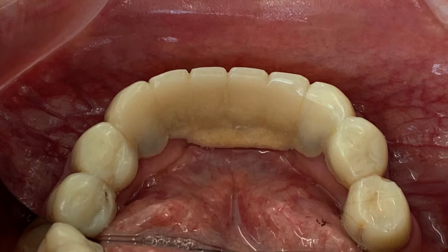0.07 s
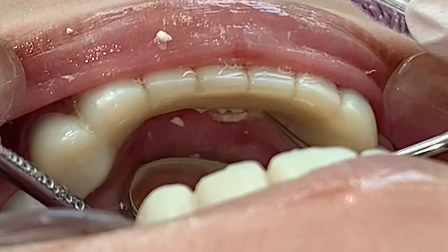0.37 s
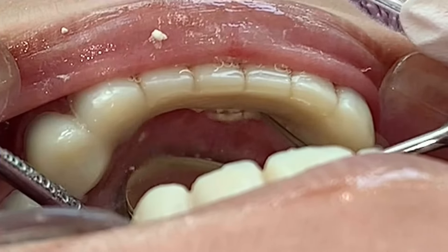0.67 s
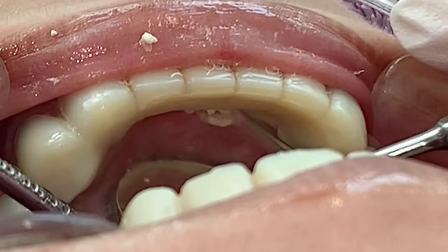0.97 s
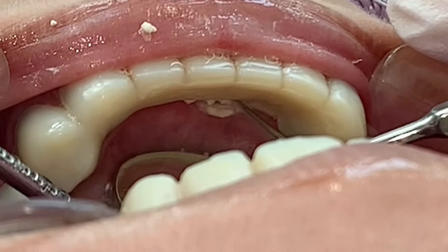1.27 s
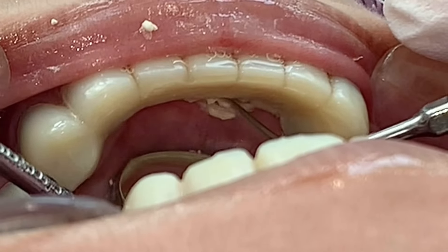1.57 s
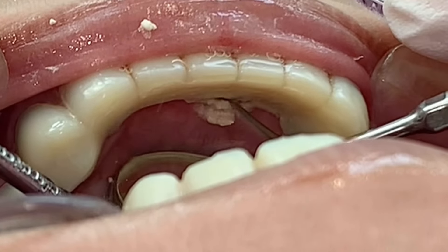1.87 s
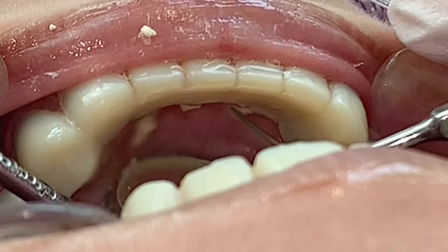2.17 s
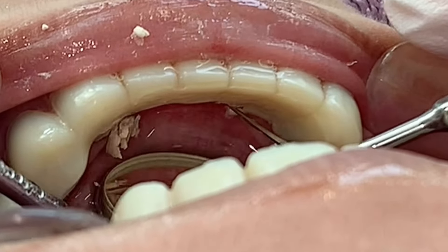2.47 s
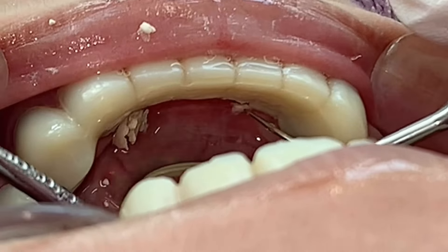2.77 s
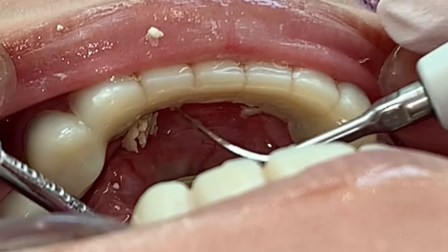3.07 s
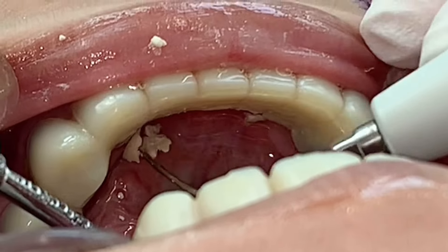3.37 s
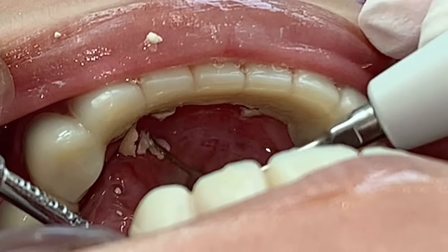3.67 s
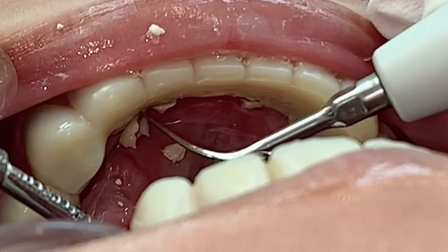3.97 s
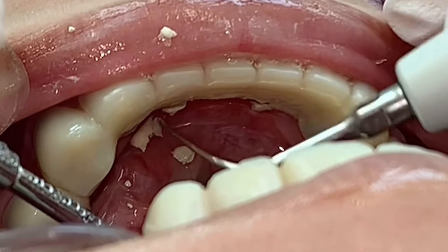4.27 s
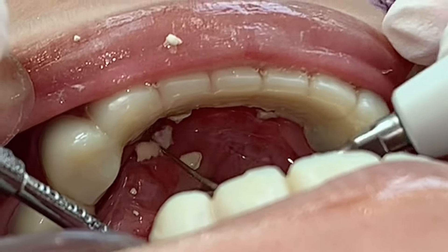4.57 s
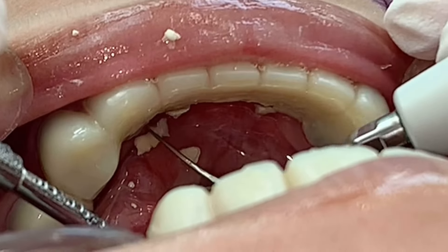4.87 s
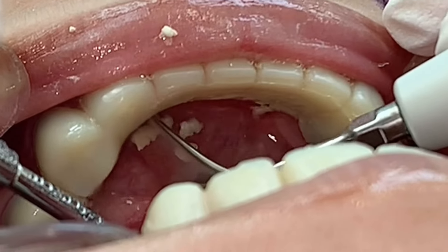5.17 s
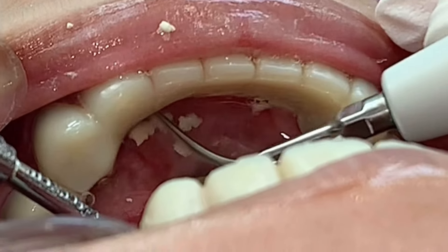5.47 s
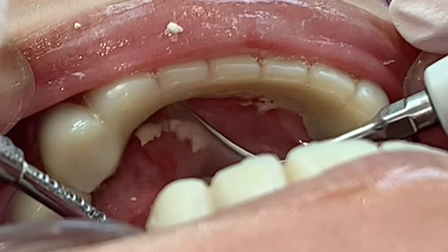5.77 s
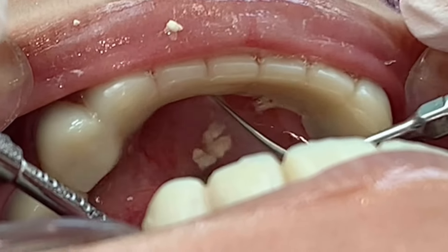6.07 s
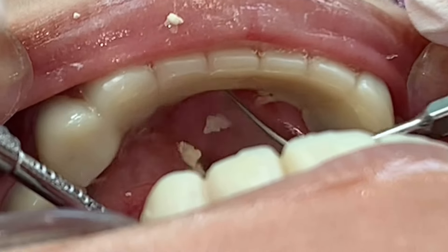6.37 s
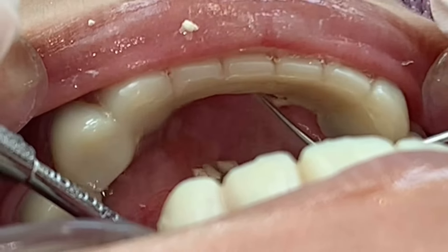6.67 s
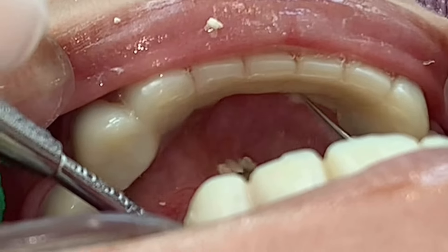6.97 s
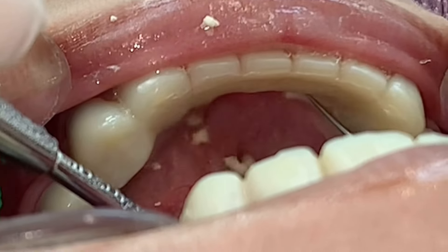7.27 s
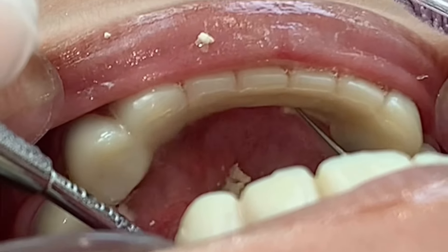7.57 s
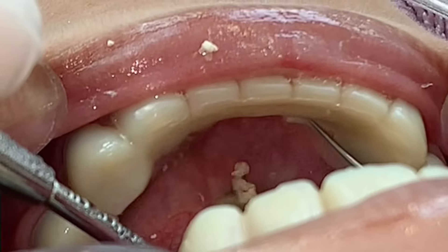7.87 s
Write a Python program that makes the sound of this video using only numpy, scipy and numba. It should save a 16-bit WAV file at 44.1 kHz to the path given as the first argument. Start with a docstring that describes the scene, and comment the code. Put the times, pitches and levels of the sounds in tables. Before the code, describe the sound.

An ultrasonic dental scaler works very close to the microphone, slightly to the left, its water spray hissing throughout. Almost straight ahead, a suction tube draws air and water, gurgling with irregular pops and spits that ring hollowly in the mouth. From the start until about 1.7 seconds, the tip presses on a tooth in several very high, wavering squeals, with a thin whistle above that lingers a little longer. A tiny gritty crunch comes near 2.3 seconds. Until about 5 seconds only the spray, with brief splashy swells, and the popping suction continue. From about 5.2 seconds to the end at 8, the tip returns in louder, short, choppy squeals, sharp squeaks and light rasps over tartar, and the hiss grows somewhat stronger. Clinic machinery rumbles faintly underneath, with a few soft, dull bumps.

```python
"""Dental surgery: an ultrasonic scaler chips tartar off teeth, close to a pair of microphone ports.
Pressed on a tooth, the tip squeals near 11 kHz; a thin whistle lies above and its water spray hisses.
A suction tube gurgles, pops and spits; the mouth cavity colours the popping.
Machinery rumbles faintly behind."""
import sys
import numpy as np
from scipy import signal
from scipy.fft import rfft, irfft, next_fast_len
from scipy.io import wavfile
from numba import njit

SR = 44100
rng = np.random.default_rng(int(sys.argv[2]) if len(sys.argv) > 2 else 0)


def log_audio(samples):
    """Write samples as a 16-bit WAV file to the path given in sys.argv[1]."""
    # one column per channel
    frames = np.atleast_2d(samples).T
    # limit to full scale, then quantise
    limited = np.clip(frames, -1, 1)
    pcm = np.round(limited * 32767).astype(np.int16)
    wavfile.write(sys.argv[1], SR, pcm)


N = 358091
TIME = np.arange(N) / SR

# tip pressed on a tooth: t/s, attack/s, hold/s, release/s, level/dB, f/Hz, glide/Hz, noisy share/0-1
TIP_STROKES = [(0.104, 0.01, 0.14, 0.076, -27, 11120, -1.5, 0.1),
               (0.287, 0.047, 0.14, 0.0087, -27, 11220, 149, 0.09),
               (0.643, 0.014, 0.11, 0.025, -28.5, 11100, -100, 0.32),
               (0.903, 0.013, 0.42, 0.066, -24.5, 11160, -1, 0.31),
               (1.573, 0.035, 0.079, .025, -32, 10800, 4.5, 0.48),
               (5.159, 0.006, 0.013, 0.015, -21.5, 9670, 0, 0.05),
               (5.185, 0.013, 0.05, 0.01, -19, 11100, 193, 0.26),
               (5.31, 0.041, 0.015, 0.045, -19, 11190, 211, 0.4),
               (5.37, 0.033, 0.092, 0.009, -21, 11080, -100, 0.44),
               (5.592, 0.014, 0.024, 0.02, -28.5, 9740, 402.5, 1),
               (5.669, 0.076, 0.038, 0.017, -24, 11270, 0.5, 0.6),
               (5.79, 0.023, .04, 0.017, -30, 9860, -300, 1),
               (5.892, 0.015, 0.033, 0.053, -27, 9740, 199.5, 0.3),
               (6.107, 0.13, 0.025, 0.047, -17, 11120, -250, 0.42),
               (6.487, 0.053, 0.018, 0.041, -24.5, 11140, -1.5, 0.7),
               (6.589, 0.0083, 0.071, 0.22, -22, 11100, 2, 0.36),
               (6.888, 0.029, 0.032, 0.07, -22, 11100, 198, 0.26),
               (7.029, 0.012, 0.035, 0.0063, -19, 11330, 605, 0.23),
               (7.161, 0.025, 0.013, 0.034, -19, 11300, -700, 0.55),
               (7.223, 0.023, 0.011, .02, -28, 9700, -2.5, 0.63),
               (7.536, 0.028, 0.028, 0.19, -18, 11220, -0.5, 0.46),
               (7.683, 0.076, 0.075, 0.023, -23, 11100, 0, 0.2),
               (7.855, 0.016, 0.081, 0.032, -29, 11600, 6, 0.45),
               (7.963, 0.044, 0.009, 0.096, -20, 11240, -400, 0.5)]
# weaker tones riding on the squeal: offset/Hz, level/dB
SQUEAL_SIDEBANDS = [(-4100, -17.5), (4200, -15.5)]
# lower tip mode in steady contact: t/s, length/s, f/Hz, level/dB
TIP_RINGS = [(0.115, .22, 7270, -37), (0.93, .37, 7180, -43.5), (1.616, 0.094, 6280, -40),
             (6.114, 0.1, 7380, -31.5), (6.603, 0.14, 7350, -32.5)]
# tip catches: t/s, peak/dB
TIP_SQUEAKS = [(5.6715, -18.5), (5.6981, -15.5), (6.076, -17.5), (6.113, -18), (7.505, -14),
               (7.5115, -12.5), (7.939, -15)]
# tip rasps over tartar: t/s, length/s, level/dB
TIP_RASPS = [(5.195, 0.068, -41.5), (5.34, 0.153, -41.5), (6.16, 0.11, -45), (6.53, .13, -43.5),
             (6.9, 0.089, -42.5), (7.545, 0.047, -37.5), (7.64, 0.066, -44), (7.715, 0.11, -36.5),
             (7.999, 0.052, -41.5)]
# tip drags through loose grit: t/s, length/s, level/dB
GRIT_DRAGS = [(2.255, .1, -44.5)]
# tip rests lightly: t/s, length/s, level/dB
TIP_WHISTLES = [(0.11, 0.49, -43), (0.53, 0.41, -38), (1.38, 0.97, -43), (4.99, 0.58, -37.5),
                (5.8, 0.17, -34), (6.2, 0.096, -31), (6.37, 0.14, -41), (6.6, 0.14, -34), (7.31, .19, -34),
                (7.66, 0.15, -33), (7.82, 0.095, -28)]
# water atomised at the tip: t/s, level/dB
SPRAY_FEED = [(0.1, -35), (0.85, -39), (1.3, -36), (2.2, -36.5), (2.6, -32), (2.95, -38), (4.3, -36.5),
              (4.9, -33.5), (5.25, -29.5), (5.7, -32.5), (6.05, -32), (6.4, -33.5), (6.75, -31),
              (7.2, -28.5), (8.1, -32.5)]
# spray spectrum: f/Hz, density/dB
SPRAY_SPECTRUM = [(1500, -24), (3100, -16.5), (4100, -7), (4750, -3), (5200, -4), (5700, -1), (7000, -3),
                  (8200, 0), (8900, -3), (10000, 0), (12400, 1), (13300, -3), (15600, -3), (17000, -7)]
# jet sweeps over a tooth: t/s, length/s, level/dB
JET_SPLASHES = [(1.37, 0.064, -38), (1.575, 0.11, -32.5), (2.245, 0.22, -32.5), (3.16, 0.095, -34),
                (3.42, 0.34, -34.5), (3.89, 0.4, -42), (5.35, 0.11, -26.5), (6.82, 0.073, -31.5)]
# teeth shade the finest hiss: t/s, treble gain/dB
TEETH_SHADE = [(0.1, 3.5), (2.35, 2.5), (2.7, -7), (4.3, 0), (4.9, -1), (5.1, 2), (8.1, -3)]
# air and water drawn into the tube: t/s, level/dB
TUBE_DRAW = [(0.1, -37.5), (0.7, -40.5), (1.15, -35.5), (1.7, -38.5), (2.15, -35), (2.7, -38), (3.9, -37.5),
             (4.7, -40), (5.2, -36.5), (5.8, -38), (6.1, -42), (6.9, -35.5), (7.6, -37), (8.1, -37.5)]
# tube gulps (+) or runs dry (-): t/s, length/s, gain/dB
TUBE_GULPS = [(0.868, 0.082, 3), (2.841, 0.33, -5.5), (3.197, 0.092, 2), (3.3, 0.12, -4),
              (4.278, 0.1, -6.5), (4.742, 0.023, -9), (6.168, 0.081, 6.5), (6.281, 0.11, -7),
              (7.805, 0.13, -3.5)]
# water slugs pop in the tube: t/s, peak/dB
SLUG_POPS = [(0.135, -19.5), (0.2229, -16.5), (0.236, -18), (0.456, -18.5), (0.541, -18.5), (0.577, -16),
             (0.658, -17.5), (0.6799, -18.5), (0.8696, -16), (0.934, -14), (1.032, -18), (1.1086, -14),
             (1.143, -16.5), (1.262, -16), (1.317, -16.5), (1.428, -19), (1.49, -15.5), (1.7774, -16.5),
             (1.9157, -14.5), (1.929, -16), (1.978, -18), (2.0453, -13.5), (2.0971, -14.5), (2.109, -14),
             (2.17, -17), (2.187, -17.5), (2.4359, -18.5), (2.446, -13.5), (2.5019, -12.5), (2.5681, -15),
             (2.675, -15), (2.7101, -13.5), (3.27, -17.5), (3.886, -17.5), (3.9798, -19), (4.253, -19),
             (4.2765, -20.5), (4.4837, -24), (4.561, -22), (4.6603, -19), (4.728, -16), (4.869, -18.5),
             (4.932, -20), (4.9666, -34), (5.143, -17), (5.332, -16.5), (6.197, -16), (6.391, -18),
             (6.4106, -17.5), (6.452, -19), (6.546, -17), (6.626, -15), (6.644, -17), (6.731, -28),
             (6.782, -17.5), (6.7987, -16.5), (6.813, -19), (6.879, -12.5), (6.922, -16.5), (7.0245, -14.5),
             (7.135, -17), (7.258, -17.5), (7.324, -20), (7.3881, -20), (7.4614, -14.5), (7.475, -16),
             (7.544, -15), (7.5817, -13.5), (7.638, -15.5), (7.76, -23), (7.797, -16.5)]
# droplets from the sharpest pops: t/s, peak/dB
DROPLET_SPITS = [(0.4557, -26), (0.5405, -20.5), (2.445, -23), (2.6737, -21.5), (3.27, -22),
                 (6.4103, -23.5), (6.7812, -22), (6.878, -20), (7.0242, -24), (7.258, -23), (7.459, -18),
                 (7.4753, -16)]
# mouth cavity: t/s, main mode f/Hz, upper mode relative level/dB
MOUTH_SHAPE = [(0.1, 1480, -8), (1.1, 1552, -20.5), (1.6, 1460, -9.5), (2.15, 1515, -15.5), (3.3, 1405, -8),
               (4.8, 1330, -9), (5.4, 1330, -3.5), (6.0, 1412, -7), (8.1, 1428, -5.5)]
# machinery rumble: t/s, level/dB
RUMBLE_LEVEL = [(0.1, -48), (.9, -53), (1.6, -45.5), (3.0, -47.5), (5.5, -46), (8.1, -44)]
# rumble spectrum: f/Hz, density/dB
RUMBLE_SPECTRUM = [(20, -42), (38, -6), (54, 0), (76, 6.5), (100, -2), (160, -3.5), (235, 1), (320, -6),
                   (500, -10.5), (800, -17), (3000, -79)]
# soft bumps: centre t/s, sigma/s, upper edge/Hz, level/dB
LOW_BUMPS = [(0.532, 0.066, 318, -39), (1.497, 0.03, 620, -40.5), (1.974, 0.034, 169, -41),
             (5.036, 0.078, 162, -43), (5.778, 0.07, 316, -38)]


def squeal(notes, roughness, hop_hz=260, wobble_hz=85, width_hz=540, fringe_db=-11, pressure_db=2.15):
    """On enamel the tip hops between two pitches; on tartar it screeches with a wide scraping fringe."""
    slip = np.tanh(2 * drift(26))
    loose = np.clip(roughness * (1.5 + .4 * slip), 0, 1)
    tone = phasor(hop_hz * slip / 2 + wobble_hz * drift(87.3))
    tone *= np.sqrt(1 - loose) + np.sqrt(loose) * chatter(width_hz)
    fringe = from_db(fringe_db) * np.sqrt(loose) * chatter(width_hz=2000)
    swing = unit_rms(tone / np.sqrt(1 + np.abs(tone / 2) ** 2) * (1 + fringe))  # friction limits it
    sidebands = sum(from_db(db) * phasor(hz) * chatter(width_hz) for hz, db in SQUEAL_SIDEBANDS)
    hand_pressure = unit_rms(from_db(pressure_db * np.tanh(drift(48))))
    return np.sqrt(2) * (notes * swing * (1 + sidebands)).real * hand_pressure * from_db(-0.08)


def contact():
    """Tip on tooth: gain, gliding notes and roughness of all strokes."""
    power, notes, rough_power = 1e-12, 0, 0
    for start_s, attack_s, hold_s, release_s, db, hz, glide_hz, noisy in TIP_STROKES:
        gain = from_db(db) * trapezoid(start_s, attack_s, hold_s, release_s)
        progress = np.clip((TIME - start_s) / (attack_s + hold_s + release_s), 0, 1)
        notes += gain * phasor(hz + glide_hz * (progress - .5))
        power += gain ** 2
        rough_power += gain ** 2 * noisy
    return np.sqrt(power), notes, np.clip(rough_power / power, 0, 1)


def rings(wander_hz=95, flicker_db=4, edge_s=0.0044):
    """Lower tip mode: a metallic line that wavers and stutters."""
    notes = sum(phasor(hz) * from_db(db) * trapezoid(start_s, edge_s, length_s - edge_s, edge_s)
                for start_s, length_s, hz, db in TIP_RINGS)
    notes *= phasor(wander_hz * drift(92.4))
    return np.sqrt(2) * notes.real * unit_rms(from_db(flicker_db * drift(54)))


def squeaks(hz=11300, wander_hz=150, gain_db=1):
    """The tip catches; its squealing mode sounds for a few milliseconds."""
    return phasor(hz + wander_hz * drift(87)).real * swells(TIP_SQUEAKS, rise_s=0.0011) * from_db(gain_db)


def rasps(shank_hz=4040, partner_hz=6930, partner_db=2, wander_hz=80):
    """Hard scraping shakes two shank modes whose pitches sum to about that of the squeal."""
    judder = chatter(width_hz=380) * phasor(wander_hz * drift(17))
    pair = phasor(shank_hz) * judder + from_db(partner_db) * phasor(partner_hz) * np.conj(judder)
    return np.sqrt(2) * pair.real * gates(TIP_RASPS, rise_s=0.0044, fall_s=0.0044)


def grit(grains_per_s=900, modes_hz=(2050, 3500)):
    """Tartar crumbs crunch under the tip and ring in two short resonances."""
    grains = rng.standard_normal(N) * (rng.random(N) < grains_per_s / SR)
    crunch = sum(unit_rms(resonance(grains + 1e-18, hz, width_hz=hz / 3)) for hz in modes_hz)
    return unit_rms(crunch) * gates(GRIT_DRAGS, rise_s=0.0044, fall_s=0.056)


def whistle(hz=14750, wander_hz=110, flicker_db=2):
    """High, airy tip mode driven by light friction."""
    friction = unit_rms(drift(300) + 1j * drift(300))
    tone = np.sqrt(2) * (phasor(hz + wander_hz * drift(3.1)) * friction).real
    return tone * gates(TIP_WHISTLES, rise_s=0.019, fall_s=0.031) * from_db(flicker_db * drift(34))


def spray(jet_db, flutter_db=2, gain_db=-2, treble_db_per_db=0.59, reference_db=-33):
    """Mist off the tip: hiss that flutters with the water feed; a stronger jet is brighter."""
    shade_db, = curves(TEETH_SHADE)
    hiss = coloured(rng.standard_normal(N), SPRAY_SPECTRUM)
    treble = filtered(hiss, lambda hz: np.clip((hz - 6500) / 8000, 0, 1))
    treble_db = shade_db + treble_db_per_db * np.clip(jet_db - reference_db, -20, 2)
    hiss += treble * (from_db(treble_db) - 1)
    return hiss * from_db(jet_db + gain_db + flutter_db * (drift(15.6) + drift(45) / 2))


def jet_level_db(rubbing, rubbing_db=-6):
    """Power sum of feed, splashes and water thrown off by rough rubbing."""
    feed_db, = curves(SPRAY_FEED)
    splashes = gates(JET_SPLASHES, rise_s=0.012, fall_s=0.056)
    return 10 * np.log10(from_db(feed_db) ** 2 + splashes ** 2 + (rubbing * from_db(rubbing_db)) ** 2)


def suction(gurgle_db=14.5, pop_db=29.5, tick_db=-1):
    """Film bursts and slug pops ring in the mouth; the pops also tick brightly."""
    slugs = impulses(SLUG_POPS)
    ticks = from_db(tick_db) * resonance(slugs, hz=4500, width_hz=20000)
    drive = from_db(gurgle_db) * film_bursts() + from_db(pop_db) * slugs
    return mouth(drive) + bubbles() + from_left(ticks + spits())


def flow_db():
    """Tube flow: slow draw plus gulps and dry moments."""
    draw_db, = curves(TUBE_DRAW)
    edge_s = 0.0034
    return draw_db + sum(db * trapezoid(start_s, edge_s, length_s - edge_s, edge_s)
                         for start_s, length_s, db in TUBE_GULPS)


def film_bursts(base_per_s=220, clump_db=3, air_gain=0.52, gain_db=1.27):
    """Water films burst at random in the tube inlet, over a rush of air."""
    sizes = from_db(6 * np.minimum(rng.exponential(1, N), 2)) * rng.choice([-1, 1], N)
    bursting = rng.random(N) < base_per_s * from_db(clump_db * drift(18)) / SR
    return (unit_rms(sizes * bursting) + air_gain * rng.standard_normal(N)) * from_db(flow_db() + gain_db)


def mouth(drive, low_ratio=0.76, low_db=-8, upper_hz=2080, upper_trim_db=2.14, echo_db=-15, t60_s=0.08):
    """Three cavity modes, shifted by sloshing water; the upper one radiates to the right."""
    centre_hz, upper_db = curves(MOUTH_SHAPE)
    slosh_hz = 55 * drift(44)
    body = resonance(drive, centre_hz + slosh_hz, width_hz=358)
    body -= from_db(low_db) * resonance(drive, low_ratio * centre_hz + slosh_hz, width_hz=723)
    upper = from_db(upper_db + upper_trim_db) * resonance(drive, upper_hz + slosh_hz, width_hz=224)
    direct = ports(body, lag_ms=-.065, pan_db=-.4) + ports(upper, lag_ms=.06, pan_db=-10)
    # diffuse tail off nearby surfaces
    age_s = TIME[:SR // 4]
    tail = rng.standard_normal((2, len(age_s))) * from_db(-60 * age_s / t60_s)
    tail /= np.sqrt(np.sum(tail ** 2, axis=1, keepdims=True))
    echoes = signal.fftconvolve([body + from_db(7) * upper], tail, axes=1)[:, :N]
    return direct + from_db(echo_db) * echoes


def bubbles(t60_s=0.039, pitch_spread=0.073, gain_db=-12, small_per_s=22, small_db=12):
    """Each pop leaves a bubble ringing upward from near the mouth's pitch; small ones come at random."""
    centre_hz, _ = curves(MOUTH_SHAPE)
    births = impulses(SLUG_POPS) + (rng.random(N) < small_per_s / SR) * from_db(flow_db() + small_db)
    age_s, out = TIME[:SR // 20], np.zeros(N + SR)
    for i in np.flatnonzero(births):
        hz = centre_hz[i] * np.exp(pitch_spread * rng.standard_normal())
        phase_rad = 2 * np.pi * hz * age_s * (1 + 2 * age_s)
        envelope = (1 - np.exp(-hz * age_s)) * from_db(-60 * age_s / t60_s)
        out[i:i + len(age_s)] += births[i] * np.sin(phase_rad) * envelope
    return out[:N] * from_db(gain_db)


def spits(gain_db=-5):
    """Spitting water: very short, broad cracks."""
    crack = unit_rms(resonance(rng.standard_normal(N), hz=5200, width_hz=7000))
    return crack * swells(DROPLET_SPITS, rise_s=0.0009) * from_db(gain_db)


def air_rush(inlet_db=-10.5, hollow_db=-7.5):
    """Air enters the tube and stirs the mouth's low hollow, which opens with the upper mode."""
    inlet_noise, hollow_noise = rng.standard_normal((2, N))
    _, upper_db = curves(MOUTH_SHAPE)
    inlet = unit_rms(resonance(inlet_noise, hz=1150, width_hz=720)) * from_db(inlet_db)
    hollow = unit_rms(resonance(hollow_noise, hz=400, width_hz=440)) * from_db(hollow_db + upper_db)
    return (inlet + ports(hollow, lag_ms=.5, pan_db=-5)) * from_db(flow_db())


def rumble(gain_db=0.4, side_db=-13.5, side_cut_hz=130):
    """Surgery machinery: low noise, more alike at both ports the deeper it is."""
    level_db, = curves(RUMBLE_LEVEL)
    mid, side = (coloured(white, RUMBLE_SPECTRUM) for white in rng.standard_normal((2, N)))
    side = signal.sosfilt(signal.butter(1, side_cut_hz, "high", fs=SR, output="sos"), side)
    return (mid + from_db(side_db) * side * [[1], [-1]]) * from_db(level_db + gain_db)


def bumps(low_hz=65):
    """Dull, soft swells of low noise."""
    out = np.zeros(N)
    for centre_s, sigma_s, top_hz, db in LOW_BUMPS:
        band = signal.butter(2, [low_hz, top_hz], "band", fs=SR, output="sos")
        thud = unit_rms(signal.sosfilt(band, rng.standard_normal(N)))
        out += thud * from_db(db) * np.exp(-((TIME - centre_s) / sigma_s) ** 2 / 2)
    return out


def from_db(db):
    """Decibels to gain."""
    return 10 ** (np.asarray(db) / 20)


def unit_rms(x):
    """Scale to unit power."""
    return x / np.sqrt(np.mean(np.abs(x) ** 2) + 1e-20)


def curves(rows):
    """Each column after t/s, interpolated per sample."""
    times_s, *columns = np.transpose(rows)
    return [np.interp(TIME, times_s, column) for column in columns]


def drift(corner_hz):
    """Smooth random motion, unit RMS."""
    pole = np.exp(-2 * np.pi * corner_hz / SR)
    return unit_rms(signal.lfilter([1], [1, -2 * pole, pole * pole], rng.standard_normal(N + SR))[SR:])


def chatter(width_hz):
    """Beating complex swing of a mode that friction knocks out of step."""
    lowpass = signal.butter(2, width_hz / 2, fs=SR, output="sos")
    real, imaginary = signal.sosfilt(lowpass, rng.standard_normal((2, N)))
    return unit_rms(real + 1j * imaginary)


def phasor(hz):
    """Unit phasor along a frequency curve."""
    return np.exp(2j * np.pi * np.cumsum(hz * np.ones(N)) / SR)


def trapezoid(start_s, attack_s, hold_s, release_s):
    """Linear rise, hold and fall."""
    return np.interp(TIME, start_s + np.cumsum(np.abs([0, attack_s, hold_s, release_s])), [0, 1, 1, 0])


def gates(rows, rise_s, fall_s):
    """One trapezoid per row of t/s, length/s, level/dB."""
    return sum(from_db(db) * trapezoid(start_s, rise_s, length_s - rise_s, fall_s)
               for start_s, length_s, db in rows)


def impulses(rows):
    """One click per row of t/s, peak/dB."""
    clicks = np.zeros(N)
    for start_s, db in rows:
        clicks[int(start_s * SR)] += from_db(db)
    return clicks


def swells(rows, rise_s):
    """One rise and decay per row of t/s, peak/dB."""
    age = TIME[:SR // 10] / rise_s
    return signal.fftconvolve(impulses(rows), age * np.exp(1 - age))[:N]


def filtered(x, response):
    """Apply a response given as a function of f/Hz."""
    size = next_fast_len(N + SR // 10)
    hz = np.maximum(np.arange(size // 2 + 1) * SR / size, 1)
    return irfft(rfft(x, size) * response(hz), size)[..., :N]


def coloured(x, spectrum):
    """Shape x by points of f/Hz, level/dB; unit RMS."""
    points_hz, points_db = np.transpose(spectrum)
    return unit_rms(filtered(x, lambda hz: from_db(np.interp(np.log(hz), np.log(points_hz), points_db))))


@njit
def bandpass(x, angle_rad, r):
    """Two poles of radius r and moving angle; unit peak gain."""
    y = np.zeros(len(x))
    for i in range(2, len(x)):
        feedback = 2 * r * np.cos(angle_rad[i]) * y[i - 1] - r * r * y[i - 2]
        y[i] = (1 - r * r) / 2 * (x[i] - x[i - 2]) + feedback
    return y


def resonance(x, hz, width_hz):
    """Steep-skirted mode: two band-passes in series, each width_hz wide."""
    angle_rad = 2 * np.pi * hz / SR * np.ones(N)
    radius = np.exp(-np.pi * width_hz / SR)
    return bandpass(bandpass(x, angle_rad, radius), angle_rad, radius)


def ports(x, lag_ms, phase_rad=0, pan_db=0):
    """One source at both ports; lag and phase act on the right, positive pan favours the left."""
    right = filtered(x, lambda hz: np.exp(-1j * (2 * np.pi * hz * lag_ms / 1000 + phase_rad)))
    return np.array([x * from_db(pan_db / 2), right * from_db(-pan_db / 2)])


def from_left(x):
    """Treble from the left: equal level at both ports, left leads."""
    return ports(x, lag_ms=.235, phase_rad=2.52)


def scene(mist_mid_db=-31, mist_side_db=-15):
    """Scaler to the left, suction almost ahead; scattered mist widens the hiss."""
    gain, notes, roughness = contact()
    jet_db = jet_level_db(gain * roughness)
    tip = squeal(notes, roughness) + rings() + squeaks() + rasps() + grit() + whistle()
    scaler = from_left(tip + spray(jet_db))
    mist = from_db(mist_mid_db) * spray(jet_db) + from_db(mist_side_db) * spray(jet_db) * [[1], [-1]]
    return scaler + mist + suction() + air_rush() + rumble() + bumps()


def record(dry, start_s=0.0882, fade_s=0.012, cutoff_hz=15950):
    """Quick fade-in, steep low-pass."""
    faded = dry * np.clip((TIME - start_s) / fade_s, 0, 1)
    return signal.sosfilt(signal.ellip(12, .1, 85, cutoff_hz, fs=SR, output="sos"), faded)


dry = scene()
out = record(dry)
log_audio(out)
```